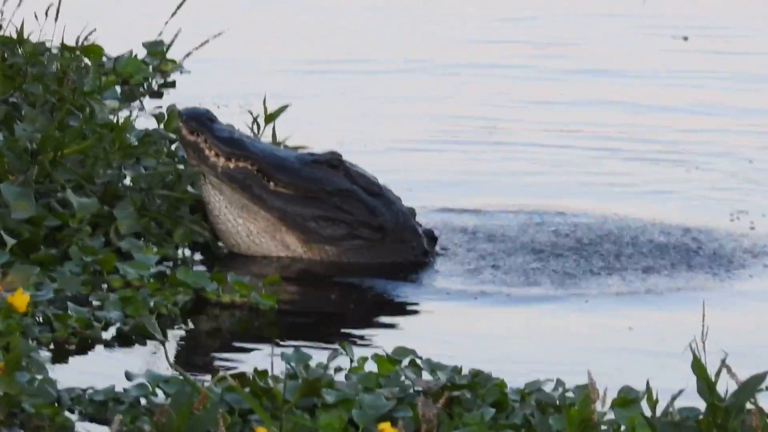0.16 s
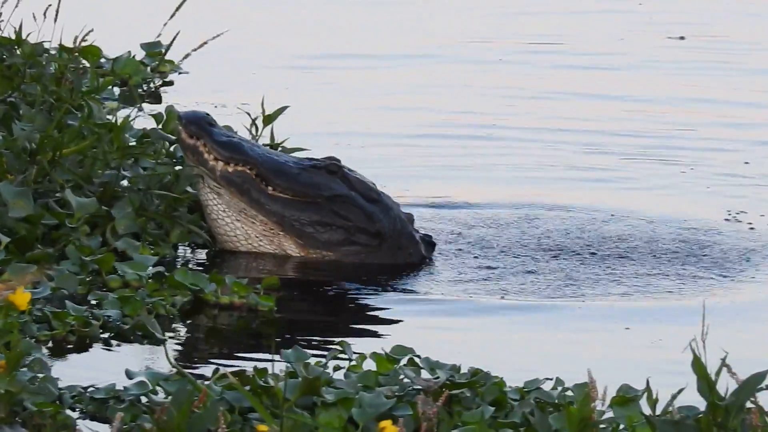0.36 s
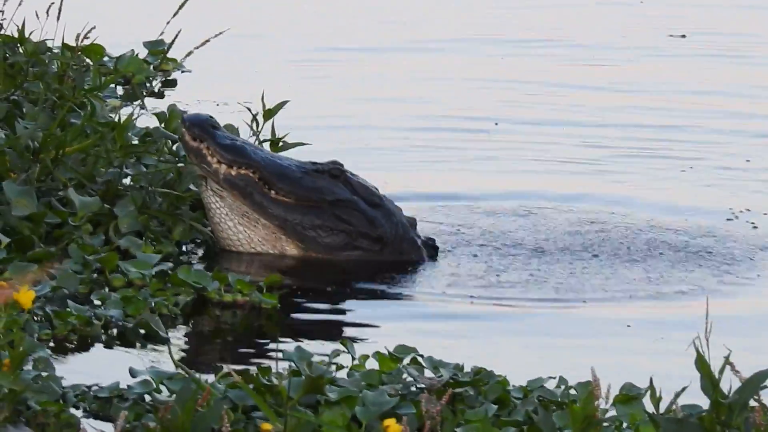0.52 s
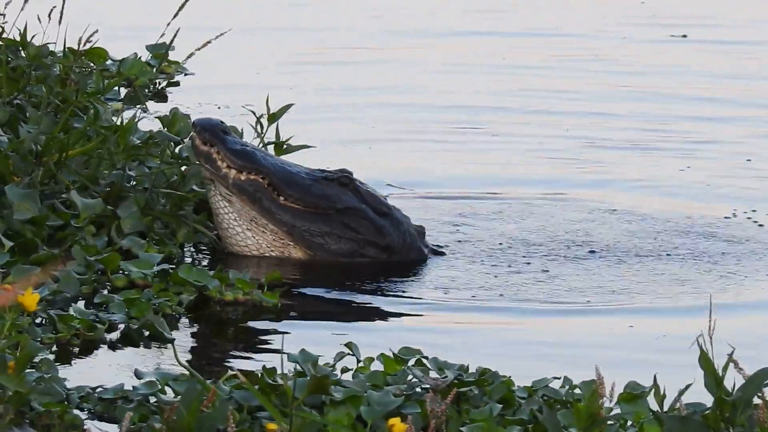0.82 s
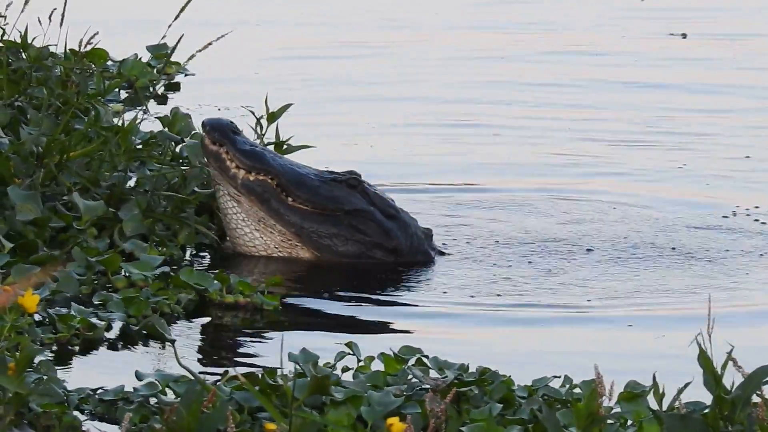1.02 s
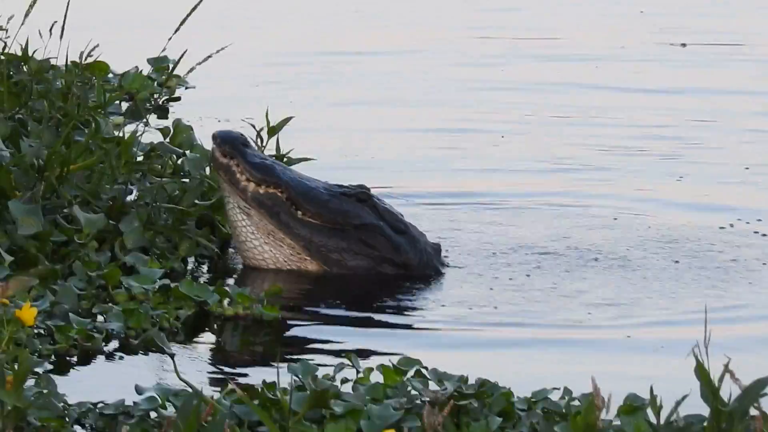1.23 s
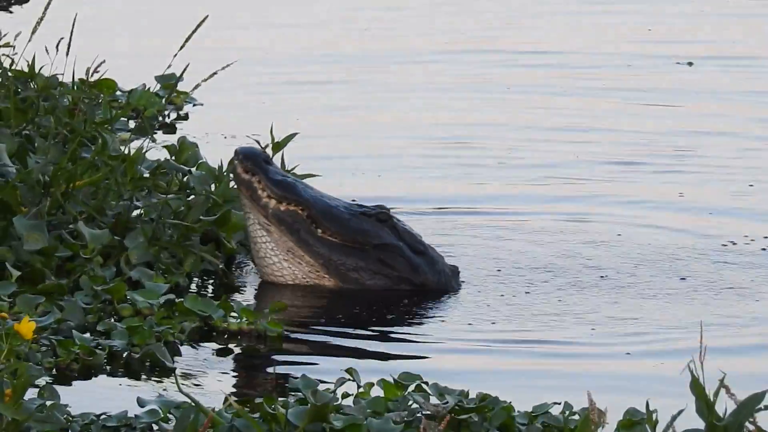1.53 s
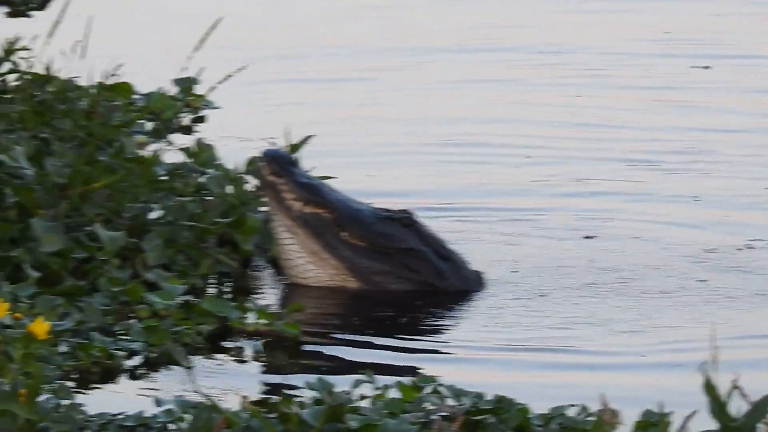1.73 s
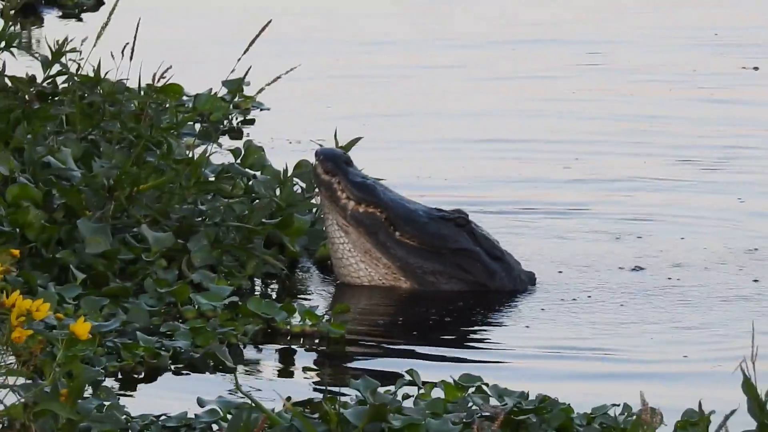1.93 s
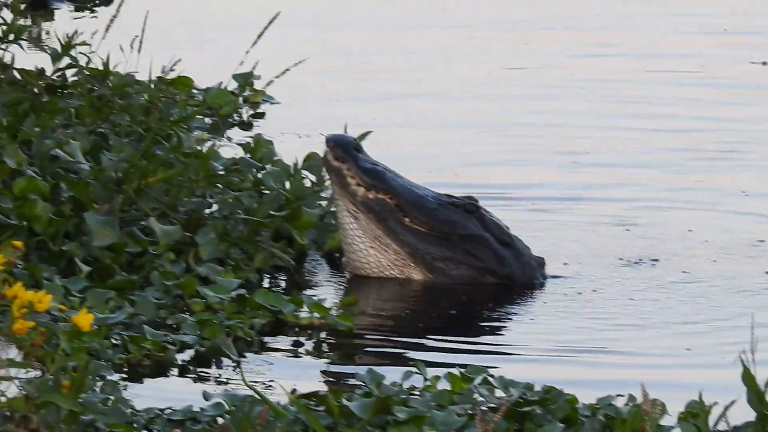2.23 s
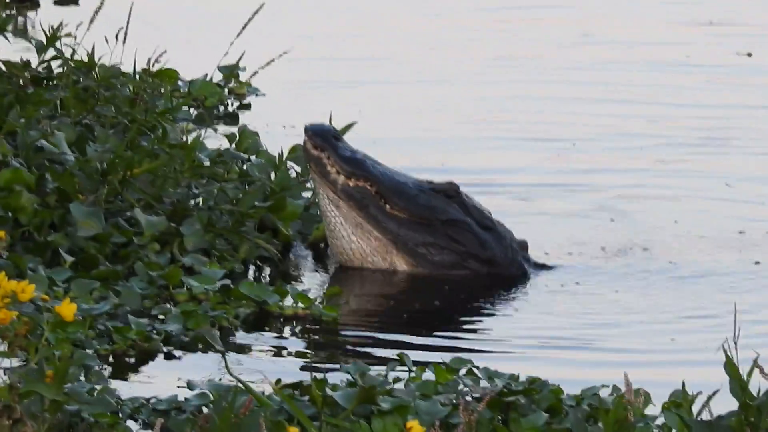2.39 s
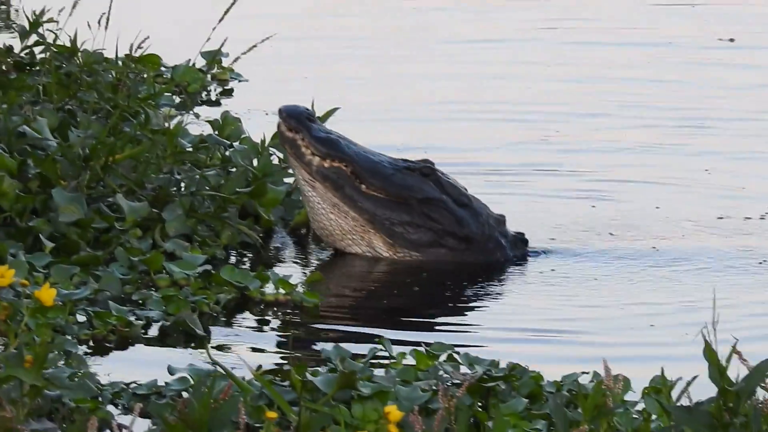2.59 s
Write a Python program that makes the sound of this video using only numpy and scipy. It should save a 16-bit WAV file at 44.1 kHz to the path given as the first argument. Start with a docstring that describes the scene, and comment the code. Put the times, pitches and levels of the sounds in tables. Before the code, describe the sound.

An alligator bellows once, swelling from about 0.2 seconds into a deep, raspy, pulsing rumble that surges from 0.5 to 1.8 seconds. Fine water spray fizzes along with it, with small plops near 1.0 and 1.9 seconds. After 2.1 seconds the pulses slow, water laps softly, and the bellow fades around 2.5 seconds. Faint, high marsh insects sing throughout.

```python
"""In a marsh full of singing insects, an alligator raises its head from calm water and bellows once.
Slow throat pulses, coming in surges, ring a low resonance near 195 Hz and a thin groan above it.
Air rasps in the airway, and the shaking back makes the water dance in a fizz of drops.
Two larger drops plop back, water laps at the head, and the banks give short echoes.
A fast limiter (an automatic volume control) flattens the strongest surges."""
import sys
import numpy as np
from scipy import signal
from scipy.fft import rfft, irfft
from scipy.io import wavfile

SR = 44100
rng = np.random.default_rng(int(sys.argv[2]) if len(sys.argv) > 2 else 0)


def master(y):
    """Save y as 16-bit WAV."""
    cut = np.clip(np.atleast_2d(y).T, -1, 1)
    pcm = np.round(cut * 32767)  # scale
    wavfile.write(sys.argv[1], SR, pcm.astype(np.int16))


N = 121275
T = np.arange(N) / SR

# tone of the insect chorus: pitch_hz, level_db
INSECT_TONE = [(2400, -9.5), (3200, -13), (3800, -16), (4500, -4), (5300, 7.5), (6200, -22), (7000, -20),
               (8200, -50), (11000, -29.5)]
# tone of the outdoor rumble: pitch_hz, level_db
RUMBLE_TONE = [(25, -20), (58, -17), (90, 3.5), (130, -1.5), (260, -1), (350, -8.5), (440, -7.5),
               (800, -22.5), (1400, -18), (2400, -35)]
# how fast the throat pulses: time_s, rate_hz
PULSE_RATE = [(0, 6.77), (.17, 30.74), (.32, 38.43), (.46, 53.68), (.66, 58.91), (.92, 58.35),
              (1.25, 54.05), (1.45, 50.7), (1.68, 46.18), (1.85, 46.46), (2.03, 45.21), (2.11, 31.65),
              (2.27, 32.62), (2.34, 23.61), (2.75, 21.88)]
# surges of pressure that sag over the next few pulses: time_s, boost_db
SURGES = [(0.462, 9), (0.518, 11.5), (0.571, 16), (0.623, 14.5), (0.673, 16), (0.724, 13.5), (0.76, 11),
          (0.813, 12), (0.86, 11.5), (0.896, 8), (0.947, 11.5), (1, 10), (1.036, 10), (1.087, 11.5),
          (1.141, 11), (1.194, 8.5), (1.238, 10), (1.291, 12), (1.348, 14.5), (1.402, 6.5), (1.467, 8.5),
          (1.525, 6.5), (1.585, 8.5), (1.646, 5), (1.713, 6.5), (1.773, 8), (2.116, 5), (2.273, 1),
          (2.345, 2)]
# pitches at which the airway rings: pitch_hz, width_hz, level_db
AIRWAY_RINGS = [(525, 156, 7), (1005, 94, -8), (1405, 54, 5), (1865, 29, -8.5), (2690, 22, -2.5),
                (3210, 63, -1), (3793, 30, -0.5)]
# loudness of the rasp: time_s, level_db
RASP_LEVEL = [(0, -36), (.28, -62), (.31, -31), (.42, -34.5), (.55, -42.5), (1.03, -36), (1.4, -36),
              (1.78, -36), (1.85, -39.5), (2.03, -35), (2.15, -39), (2.4, -43.5), (2.75, -46)]
# loudness of the dancing water: time_s, level_db
SPRAY_LEVEL = [(0, -48.5), (.25, -42), (.4, -32.5), (.6, -32), (.8, -29.5), (1.25, -28), (1.6, -30.5),
               (1.85, -32.5), (2.05, -34.5), (2.14, -37), (2.2, -40), (2.45, -45.5), (2.75, -48.5)]
# tone of the spray: pitch_hz, level_db
SPRAY_TONE = [(1000, -39.5), (2200, -17.5), (2900, -9.5), (3350, -10), (3900, -13), (4600, -1.5),
              (5300, -4), (5900, 5), (6350, 2.5), (6900, -3.5), (8000, -14), (10500, -26.5), (15500, -44.5)]
# bursts of spatter: start_s, level_over_spray_db
SPATTERS = [(.307, 10), (0.478, 5), (1.249, -2.5), (2.12, 2.5)]
# ringing drops: pitch_hz
PING_PITCHES = [3074, 3368, 5860, 6430]
# how hard the pulses push: time_s, level_db
EFFORT = [(.05, -42.5), (.17, -21), (.29, -10), (.37, -16.5), (.45, -14), (.6, -20), (1.0, -11.5),
          (1.3, -10.5), (1.75, -9.5), (2.05, -7.5), (2.1, -13), (2.36, -13), (2.48, -12.5), (2.53, -22.5),
          (2.7, -33)]
# where the throat rings most: time_s, pitch_hz
THROAT_PITCH = [(.3, 199), (.41, 152), (.52, 196.3), (1.25, 204.5), (1.75, 185.7), (2.2, 208)]
# weaker ringing of the chest: pitch_hz, width_hz, level_db
CHEST_RINGS = [(55.4, 78, -32.5), (108, 23, -22.5)]
# a thin groan that sinks as the bellow opens: time_s, pitch_hz, level_db
GROAN = [(.1, 475, -57.5), (.19, 471, -41), (.3, 437, -31), (.42, 399, -46.5), (1.7, 422, -56),
         (2.45, 410, -49.5)]
# larger drops falling back: start_s, pitch_hz, level_db, fade_s (time to fall by 60 dB)
PLOPS = [(1.018, 1390, -17.5, 0.033), (1.878, 1416, -29, 0.19)]
# water lapping at the head: time_s, pitch_hz, level_db
LAPS = [(2.245, 2860, -40.5), (2.347, 2190, -42), (2.408, 3720, -38.5)]
# echoes from the banks: delay_s, level_db
ECHOES = [(0.033, -20), (0.073, -18)]

LEFT_RIGHT = np.array([[1], [-1]])  # adds on the left, takes away on the right


def from_db(db):
    """Turn decibels into a number to multiply by."""
    return 10 ** (np.asarray(db) / 20)


def rms_one(x):
    """Scale a signal to an average strength (rms) of 1."""
    return x / np.sqrt(np.mean(x ** 2) + 1e-20)


def in_time(rows):
    """Join a table's points into one curve for each column after time."""
    s, *columns = np.transpose(rows)
    return [np.interp(T, s, c) for c in columns]


def noise():
    """A fresh, even hiss."""
    return rng.standard_normal(N)


def cut(x, order, hz, keep="low"):
    """Keep the lows, the highs or a band; a higher order cuts more steeply."""
    return signal.sosfilt(signal.butter(order, hz, keep, fs=SR, output="sos"), x)


def decay(x, seconds):
    """Give every click a fading tail."""
    return signal.lfilter([1], [1, -np.exp(-1 / (seconds * SR))], x + 1e-18)


def drift(rate_hz):
    """A smooth random wobble, about 1 in size."""
    seconds = 1 / (2 * np.pi * rate_hz)
    return rms_one(decay(decay(rng.standard_normal(N + SR), seconds), seconds)[SR:])


def ring(x, hz, width_hz):
    """Make every click ring at a pitch; a smaller width rings longer."""
    turn = np.exp(2j * np.pi * np.cumsum(hz + np.zeros(N)) / SR)
    return (turn * decay(x / turn, 1 / (np.pi * width_hz))).real


def colour(x, tone):
    """Filter a sound to follow a tone table, falling 18 dB per octave past its ends."""
    hz, db = np.transpose(tone)
    grid = np.maximum(np.fft.rfftfreq(8192, 1 / SR), 1)
    octaves_outside = np.abs(np.log2(grid / np.clip(grid, hz[0], hz[-1])))
    gain = from_db(np.interp(np.log(grid), np.log(hz), db) - 18 * octaves_outside)
    cepstrum = irfft(np.log(gain))
    half = len(cepstrum) // 2
    cepstrum[1:half] *= 2  # folded so the filter never sounds ahead of its input
    cepstrum[half + 1:] = 0
    response = irfft(np.exp(rfft(cepstrum)))[:half]
    return rms_one(signal.fftconvolve(x, response)[:N])


def spread(source, width):
    """Make a random sound twice: once for the middle, once for the sides."""
    return source() + width * source() * LEFT_RIGHT


def marsh(insect_db=-44.5, flicker_db=3.5, rumble_db=-44):
    """A flickering insect chorus sings over a faint outdoor rumble."""
    level = from_db(insect_db + flicker_db * drift(40))
    insects = level * spread(lambda: colour(noise(), INSECT_TONE), width=.58)
    rumble = from_db(rumble_db) * spread(lambda: colour(noise(), RUMBLE_TONE), width=.16)
    return insects + rumble


def throat_pulses(lead_s=.0031, surge_s=.029, uneven_db=1.4):
    """One click each time the vocal folds close, stronger at the start of a surge."""
    rate_hz, = in_time(PULSE_RATE)
    cycles = np.cumsum(rate_hz) / SR + rate_hz * lead_s
    closures = np.diff(np.floor(cycles), prepend=0)
    boost_db = sum(db * (T > s - .008) * np.exp(-((T - s) / surge_s) ** 6) for s, db in SURGES)
    return closures * from_db(boost_db + uneven_db * noise())


def rasp(pulses, steady_flow=.077, puff_s=.023):
    """A puff of air at each pulse makes the airway ring."""
    air = noise() * (steady_flow + rms_one(decay(pulses, puff_s)))
    airway = sum(from_db(db) * rms_one(ring(air, hz, width)) for hz, width, db in AIRWAY_RINGS)
    return from_db(in_time(RASP_LEVEL)[0]) * rms_one(cut(airway, 2, 5000))


def water_dance(pulses, mist_db=5.5, splash_s=.0061, throb_s=.003, spatter_s=.0054):
    """The shaking back throws up tiny drops and mist, in short splashes that throb with the pulses."""
    def clicks(per_s, spread_db):
        sizes = from_db(spread_db * np.minimum(rng.exponential(1, N), 4))
        return sizes * (rng.random(N) < per_s / SR)

    def fizz():
        drops = rms_one(clicks(per_s=2100, spread_db=3.5) * rng.choice([-1, 1], N))
        return colour(drops + from_db(mist_db) * noise(), SPRAY_TONE)

    splashes = rms_one(decay(clicks(per_s=180, spread_db=1.5), splash_s))
    throb = rms_one(decay(decay(np.sqrt(pulses), throb_s), throb_s))
    spatter = sum(from_db(db) * (T > s) * np.exp(-np.abs(T - s) / spatter_s) for s, db in SPATTERS)
    motion = rms_one(1 + .69 * splashes + .7 * throb) + spatter
    return from_db(in_time(SPRAY_LEVEL)[0]) * motion * spread(fizz, width=.2)


def pings(per_pitch_per_s=50, below_spray_db=8):
    """Single drops ring for a moment, the higher ones louder; they swell and fade with the spray."""
    rings = np.zeros(N)
    for hz in PING_PITCHES:
        drops = rng.random(N) * (rng.random(N) < per_pitch_per_s / SR)
        rings += hz * ring(drops, hz * (1 + .015 * drift(30)), width_hz=57)
    level = from_db(in_time(SPRAY_LEVEL)[0] - below_spray_db)
    return level * rms_one(cut(rings, 2, [2600, 7000], "band"))


def bellow(pulses, lift_db=1, flutter_db=-12, flutter_s=.012, waver_hz=11, throat_width_hz=63.3):
    """Each pulse, trailed by a flutter of rushing air, rings the throat and the chest."""
    push = pulses * from_db(in_time(EFFORT)[0] + lift_db)
    flutter = from_db(flutter_db) * decay(push, flutter_s) * noise() / np.sqrt(flutter_s * SR / 2)
    flow = push + flutter
    # the pitch slides up within each surge, at up to 270 Hz a second per dB of boost
    bend_hz = 270 * sum(db * (T - s - .02) * np.exp(-((T - s - .02) / .015) ** 4) for s, db in SURGES)
    pitch_hz = in_time(THROAT_PITCH)[0] + bend_hz + waver_hz * drift(21.3)
    turn = np.exp(2j * np.pi * np.cumsum(pitch_hz) / SR)
    swell_s = 1 / (np.pi * throat_width_hz)
    swell = decay(decay(flow / turn, swell_s), swell_s)  # each ring grows for a cycle, then fades
    throat = (turn * swell).imag * np.e / (swell_s * SR)
    chest = sum(from_db(db) * ring(flow, hz, width) for hz, width, db in CHEST_RINGS)
    body = cut(throat + chest, 2, 36.6, "high")
    return cut(body, 3, 266)


def groan(pulses):
    """Every pulse, strong or weak, rings the same thin, gliding note."""
    hz, db = in_time(GROAN)
    note = ring(np.sign(pulses), hz, width_hz=12.2)
    return from_db(db) * rms_one(cut(note, 2, hz.max()))


def plops(attack_s=.0011):
    """Each larger drop leaves a briefly ringing bubble."""
    bubbles = np.zeros(N)
    for start_s, hz, db, fade_s in PLOPS:
        age = np.maximum(T - start_s, 0)
        level = from_db(db - 60 * age / fade_s) * (1 - np.exp(-age / attack_s))
        bubbles += level * np.sin(2 * np.pi * hz * age)
    return bubbles


def laps(swell_s=.012):
    """Water laps at the head in short, soft splashes, each around its own pitch."""
    splashes = np.zeros(N)
    for time_s, hz, db in LAPS:
        level = from_db(db) * np.exp(-((T - time_s) / swell_s) ** 2)
        splashes += level * rms_one(ring(noise(), hz, width_hz=700))
    return cut(splashes, 3, [1300, 5000], "band")


def bank_echoes(sound, lean=.25):
    """The banks send the sound back late and faint, one more to the left, one more to the right."""
    echoes = np.zeros((2, N))
    for k, (delay_s, db) in enumerate(ECHOES):
        delayed = np.interp(T - delay_s, T, sound, left=0)
        echoes += from_db(db) * delayed * (1 + lean * (-1) ** k * LEFT_RIGHT)
    return echoes


def scene():
    """The alligator and its drops with their echoes, plus the spray and the marsh."""
    pulses = throat_pulses()
    alligator = bellow(pulses) + groan(pulses) + rasp(pulses) + plops() + laps() + pings()
    return alligator + bank_echoes(alligator) + water_dance(pulses) + marsh()


def record(dry, limit_db=-5, attack_s=.0001, release_db_per_s=260, cutoff_hz=15800):
    """A fast limiter turns the loudest peaks down, then the highest treble is cut."""
    peak_db = 20 * np.log10(np.abs(dry).max(axis=0) + 1e-9)
    over_db = np.maximum(peak_db - limit_db, 0)
    held_db = np.maximum.accumulate(over_db + release_db_per_s * T) - release_db_per_s * T
    down_db = decay(held_db, attack_s) * (1 - np.exp(-1 / (attack_s * SR)))
    treble_cut = signal.ellip(10, .1, 80, cutoff_hz, fs=SR, output="sos")
    return signal.sosfilt(treble_cut, dry * from_db(-down_db))


dry = scene()
out = record(dry)
master(out)
```